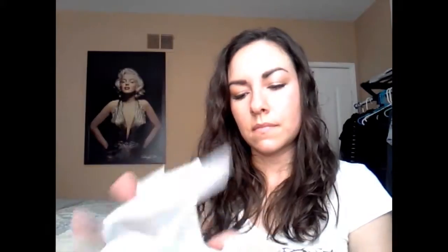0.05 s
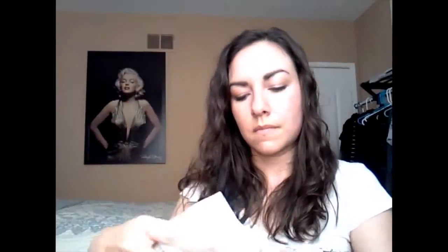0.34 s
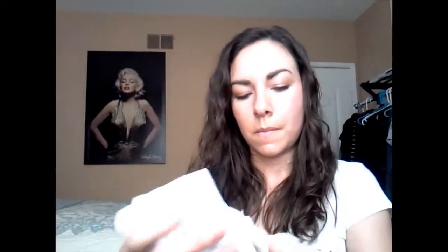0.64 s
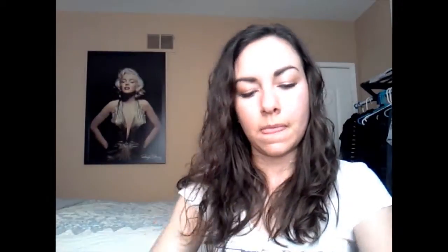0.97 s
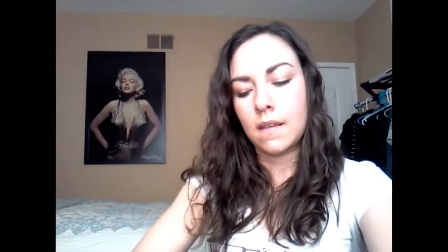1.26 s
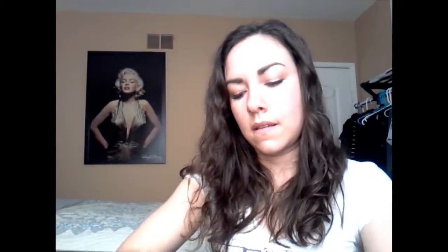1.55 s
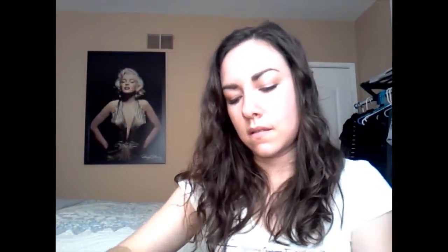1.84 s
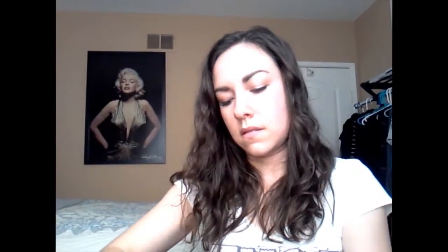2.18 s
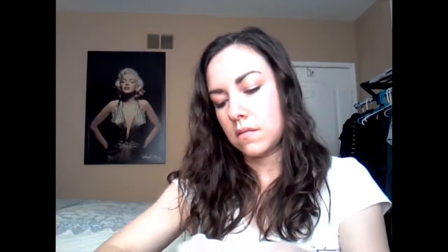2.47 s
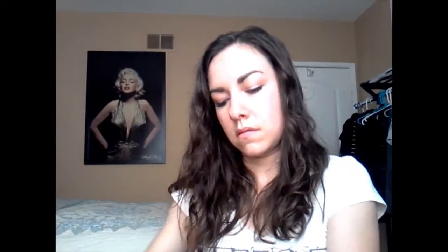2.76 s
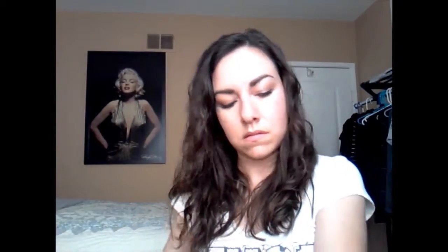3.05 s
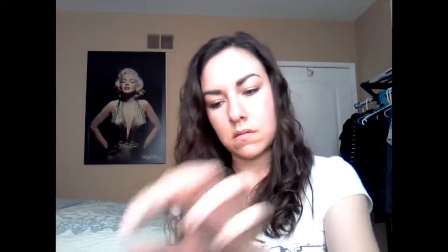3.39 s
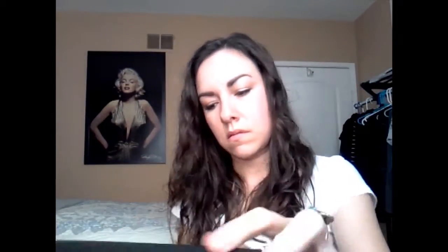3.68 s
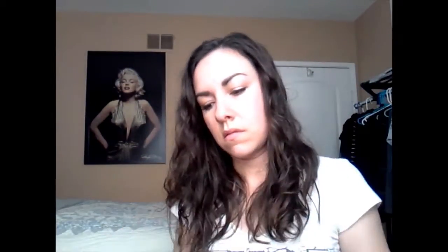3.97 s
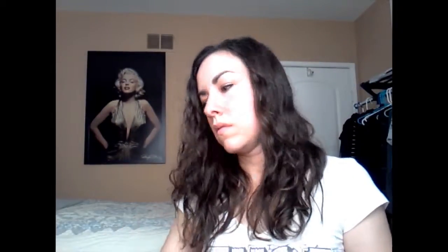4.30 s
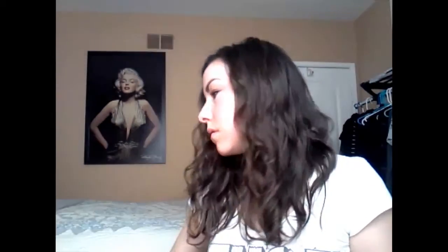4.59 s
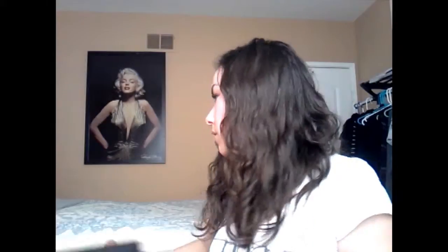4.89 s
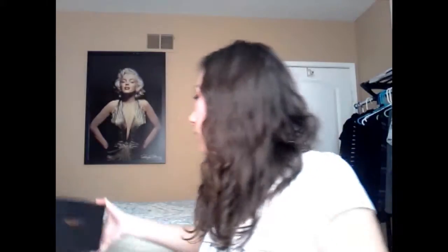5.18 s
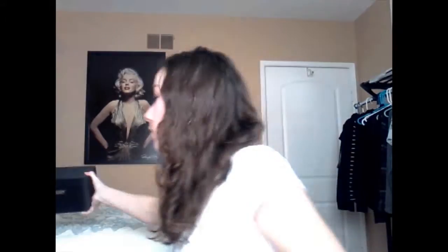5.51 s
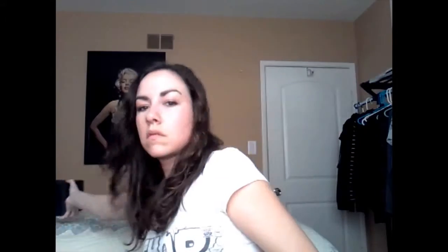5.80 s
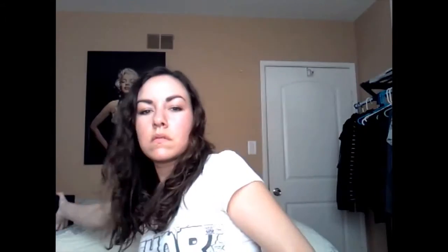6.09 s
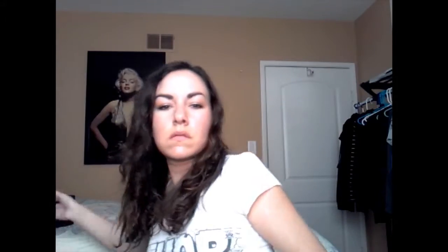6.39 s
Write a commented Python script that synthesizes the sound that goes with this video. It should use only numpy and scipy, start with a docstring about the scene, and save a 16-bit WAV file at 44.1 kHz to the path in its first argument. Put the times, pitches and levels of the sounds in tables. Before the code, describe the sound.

Thin tissue paper crinkles close by, then a box scrapes and knocks onto a desk, followed by soft bumps.

```python
"""Tissue paper and a box on a desk.

Tissue paper is crumpled and pushed aside near a small mono microphone in a bedroom: creases buckle
and shake the sheet. A box slides out, its slips ringing the cavity in a hollow scrape. One knock
rings box and desk as it is set down. Soft bumps and brushes follow over mains hum and mic hiss."""
import sys
import numpy as np
from scipy import signal
from scipy.fft import rfft, irfft, next_fast_len
from scipy.io import wavfile
from scipy.ndimage import map_coordinates

SR = 44100
rng = np.random.default_rng(int(sys.argv[2]) if len(sys.argv) > 2 else 0)


def materialize(psi):
    """Save the field psi as 16-bit PCM at rate SR to the path in sys.argv[1].

    A 1-D psi becomes a single channel; in a 2-D psi each row is a channel.
    """
    bounded = np.clip(np.atleast_2d(psi).T, -1, 1)
    quanta = np.round(bounded * 32767).astype(np.int16)
    wavfile.write(sys.argv[1], SR, quanta)


N = 293265

# paper squeezes: start_s, hold_s, crinkle_db, flutter_db, fizz_db
PAPER_SQUEEZES = [(0.005, 0.14, -25.5, -32, -34), (0.186, 0.033, -30, -33, -38),
                  (0.291, 0.11, -28.5, -34.5, -36.5), (0.436, 0.19, -26.5, -33.5, -34),
                  (0.785, 0.25, -37.5, -41, -49.5), (0.878, 0.021, -35, -39.5, -38),
                  (1.019, 0.092, -30, -32.5, -36), (1.174, 0.017, -31.5, -29.5, -42),
                  (1.24, .11, -42.5, -40.5, -52.5), (1.4, 0.14, -48, -48, -58),
                  (1.525, 0.065, -43, -57, -53), (1.942, 0.095, -54, -58, -64),
                  (2.094, .035, -43.5, -37, -51.5), (2.17, 0.13, -39.5, -38.5, -47.5),
                  (2.359, .108, -47.5, -50, -56.5), (2.502, 0.11, -43, -44.5, -50.5),
                  (2.678, 0.31, -34.5, -35.5, -43), (2.826, .014, -31, -51, -32.5),
                  (3.05, 0.0069, -44.5, -40.5, -54)]
# single creases snapping: start_s, level_db
CREASE_SNAPS = [(0.1304, -12), (0.1515, -19), (0.1864, -12), (0.293, -24), (0.3822, -9.5), (0.472, -15),
                (0.4942, -12), (0.5974, -17), (1.168, -17.5), (1.6337, -26.5), (2.5, -25.5), (2.6713, -16),
                (2.8449, -12), (2.9726, -23), (3.4052, -33.5)]
# box pushes: start_s, hold_s, drag_db, scrape_db
BOX_SLIDES = [(2.068, 0.042, -38, -28), (2.135, 0.065, -33.5, -33), (2.715, 0.21, -43.5, -34.5),
              (5.335, 0.029, -47, -61), (5.53, 0.038, -48, -62), (5.78, 0.036, -47.5, -55.5)]
# hand and cloth strokes: start_s, hold_s, swish_db, body_db
BRUSH_STROKES = [(3.41, 0.15, -53, -53.5), (3.64, 0.075, -53, -54.5), (4.135, 0.016, -59, -49.5),
                 (5.122, 0.0073, -52.5, -52.5), (5.348, 0.004, -45.5, -41.5), (5.77, 0.02, -64, -49.5)]
# hard box contacts: start_s, thud_db, clack_db, tick_db, pitch_hz
BOX_KNOCKS = [(1.083, -20, -11.5, -40, 380), (3.7622, -15.5, -39, -65, 200),
              (3.7708, -8.5, -16.5, -22, 184), (3.813, -19, -42, -65, 129)]
# soft desk contacts: start_s, thud_db, clack_db, pitch_hz
DESK_BUMPS = [(0.216, -40, -24, 232), (1.095, -32, -20, 253), (1.303, -56, -23.5, 300),
              (1.33, -30.5, -42, 136), (1.461, -39, -42, 159), (1.5, -46, -26, 113),
              (1.593, -43.5, -43, 134), (2.15, -29.5, -45.5, 163), (3.036, -20.5, -33, 187),
              (3.385, -33, -44, 116), (3.895, -28, -33, 237), (3.977, -47, -38.5, 200),
              (4.002, -26.5, -35.5, 182), (4.103, -34, -43, 109), (4.696, -32, -42, 147),
              (4.899, -38, -42.5, 190), (5.343, -52, -32, 302), (5.513, -34.5, -41, 230),
              (5.767, -37, -44, 160)]
# desk modes: freq_hz, gain_db, free_t60_s
DESK_MODES = [(102.4, -5.5, 0.62), (123, 3.5, 0.27), (154.7, -6, 0.47), (219.4, 0, 0.12), (236.3, 5, 0.13),
              (264.6, -3.5, 0.27), (329, -3, 0.14), (392, 4, 0.075), (480.5, -11.5, 0.27)]
# box cavity modes: freq_hz, width_hz, gain_db
BOX_MODES = [(510, 93, -3), (693, 242, 0.5), (776, 140, 3), (1264, 40, -6.5)]
# crease spectrum: freq_hz, gain_db
CRINKLE_EQ = [(200, -63), (800, -13.5), (1400, -5.5), (1650, -8.5), (1980, 3), (2120, -9), (2450, -0.5),
              (2900, -3), (3600, 3.5), (4200, 2), (7000, 3.5), (7900, -5), (8600, -15.5), (16000, -60)]
# shaken sheet spectrum: freq_hz, gain_db
FLUTTER_EQ = [(50, -23), (130, -13), (330, -8), (420, -8), (520, -1), (680, 6), (850, 4.5), (1040, -7.5),
              (1280, -2), (1600, -8.5), (4000, -51.5), (16000, -85)]
# finest crackle spectrum: freq_hz, gain_db
FIZZ_EQ = [(3000, -84), (7500, 2.5), (8800, -2.5), (9800, -1.5), (12500, -1.5), (14000, -7), (16000, -6.5)]
# low drag spectrum: freq_hz, gain_db
DRAG_EQ = [(40, -13), (110, -1), (200, 5), (330, -2), (450, -5), (900, -21.5), (2500, -35), (16000, -107)]
# hollow scrape spectrum: freq_hz, gain_db
SCRAPE_EQ = [(200, -40), (400, -11.5), (500, -3.5), (660, -0.5), (760, -7), (1000, -23), (2500, -30.5),
             (16000, -104)]
# edge click spectrum: freq_hz, gain_db
TICK_EQ = [(500, -32), (1100, -44), (1300, -3), (2000, -9), (3200, 3.5), (5300, -6), (6800, 2), (8200, -17),
           (16000, -29)]
# microphone hiss spectrum: freq_hz, gain_db
HISS_EQ = [(25, -26), (55, -10), (85, -12.5), (125, -10), (180, -12), (290, -12.5), (600, -16),
           (2000, -23.5), (5700, -25), (15500, -29.5)]
# mains hum: freq_hz, level_db
HUM_TONES = [(56.5, -57), (118, -66)]
# bedroom decay: freq_hz, t60_s
ROOM_DECAY = [(150, 0.22), (800, 0.4), (4000, 0.35), (12000, 0.11)]


def paper():
    """Creases buckle in small avalanches, crackle and shake the sheet, then slowly relax."""
    squeezing = strokes(PAPER_SQUEEZES, rise_db_per_s=287, fall_db_per_s=240)
    relaxing = amp(-9.5) * strokes(PAPER_SQUEEZES, rise_db_per_s=287, fall_db_per_s=99)
    crinkle, flutter, fizz = np.hypot(squeezing, relaxing)
    clump = amp(1.5 * wobble(60) + 0.84 * wobble(300))
    folds = room(impulses(rate_hz=2600, spread_db=2, clump=clump), wet_db=-6.5)
    tips = room(impulses(rate_hz=1500, spread_db=1, clump=clump), wet_db=-13.5)
    fibres = room(impulses(rate_hz=5300, spread_db=-1, clump=clump), wet_db=-11.5)
    # long folds sound low, sharp tips high
    low_share = lambda hz: 1 / (1 + (hz / 4800) ** 4)
    creases = filtered(folds, lambda hz: np.sqrt(low_share(hz)))
    creases += filtered(tips, lambda hz: np.sqrt(1 - low_share(hz)))
    return (crinkle * unit(coloured(creases, CRINKLE_EQ))
            + flutter * unit(coloured(folds, FLUTTER_EQ))
            + fizz * unit(coloured(fibres, FIZZ_EQ)))


def snaps():
    """Larger creases flip over in a fast-swelling crack."""
    track = np.zeros(N)
    rise_s = 0.00056
    for start_s, level_db in CREASE_SNAPS:
        crack = burst(t60_s=0.012)
        crack *= 1 - np.exp(-np.arange(len(crack)) / SR / rise_s)
        sheet = coloured(crack, CRINKLE_EQ) + coloured(crack, FLUTTER_EQ)
        fizz = amp(-5.5) * coloured(crack, FIZZ_EQ)
        add(track, start_s, amp(level_db) * unit_peak(sheet + fizz))
    return room(track, wet_db=-4)


def box_slide():
    """The box drags in small slips that ring its cavity."""
    drag, scrape = strokes(BOX_SLIDES, rise_db_per_s=197, fall_db_per_s=162)
    slips = impulses(rate_hz=2500, spread_db=0, clump=amp(0.94 * wobble(90)))
    return drag * unit(coloured(slips, DRAG_EQ)) + scrape * unit(coloured(slips, SCRAPE_EQ))


def knocks():
    """The box hits the desk: desk ring, hollow clack, click of the hard edge."""
    desk, box = np.zeros(N), np.zeros(N)
    for start_s, thud_db, clack_db, tick_db, pitch_hz in BOX_KNOCKS:
        thud = desk_thud(pitch_hz, focus_db=4.5, damping=1.7, scatter_db=1,
                         detune=0.0075, rise_s=0.0039, loose_rad=0.87)
        add(desk, start_s, amp(thud_db) * thud)
        add(box, start_s, amp(clack_db) * box_clack(contact_s=0.0002, roughness=0.0099))
        add(box, start_s, amp(tick_db) * unit_peak(coloured(burst(t60_s=0.019), TICK_EQ)))
    return desk + room(box, wet_db=-9.5)


def bumps():
    """Hands and box nudge the desk, scuff and rock back once; the resting hand damps the ring."""
    desk, box = np.zeros(N), np.zeros(N)
    rebounds = [(start_s + 0.035, thud_db - 9, clack_db - 9.5, pitch_hz)
                for start_s, thud_db, clack_db, pitch_hz in DESK_BUMPS]
    for start_s, thud_db, clack_db, pitch_hz in DESK_BUMPS + rebounds:
        thud = desk_thud(pitch_hz, focus_db=11, damping=1.87, scatter_db=3.5,
                         detune=0.042, rise_s=0.0038, loose_rad=3.03)
        add(desk, start_s, amp(thud_db) * thud)
        add(box, start_s, amp(clack_db) * box_clack(contact_s=0.00051, roughness=0.13))
        scuff = unit_peak(coloured(burst(t60_s=0.087), DRAG_EQ))
        add(box, start_s, amp(clack_db - 14.5) * scuff)
    return desk + room(box, wet_db=-12.5)


def desk_thud(pitch_hz, focus_db, damping, scatter_db, detune, rise_s, loose_rad):
    """A blow favours the desk modes near its pitch; loose contact starts them out of phase."""
    t = np.arange(SR // 2) / SR
    ring = np.zeros(len(t))
    for freq_hz, gain_db, free_t60_s in DESK_MODES:
        gain_draw, freq_draw, phase_draw = rng.standard_normal(3)
        strike_db = gain_db + scatter_db * gain_draw - focus_db * np.log2(freq_hz / pitch_hz) ** 2
        phase_rad = 2 * np.pi * freq_hz * (1 + detune * freq_draw) * t + loose_rad * phase_draw
        ring += amp(strike_db - 60 * t * damping / free_t60_s) * np.sin(phase_rad)
    attack = 1 - np.exp(-(t / rise_s) ** 2)
    return unit_peak(ring * attack)


def box_clack(contact_s, roughness):
    """A short, slightly rough push rings the hollow box."""
    def cavity(hz):
        modes = sum((-1) ** k * amp(gain_db) * 1j * hz * width_hz
                    / (freq_hz ** 2 - hz ** 2 + 1j * hz * width_hz)
                    for k, (freq_hz, width_hz, gain_db) in enumerate(BOX_MODES))
        return modes / (1 + 1j * hz / 1500)  # one-pole low-pass
    progress = np.arange(SR // 4) / SR / contact_s
    push = progress * np.exp(-progress) + roughness * burst(t60_s=0.028)
    return unit_peak(filtered(push, cavity))


def brushes():
    """Hands and cloth brush lightly in a grainy swish."""
    swish, body = strokes(BRUSH_STROKES, rise_db_per_s=520, fall_db_per_s=254)
    grain = room(impulses(rate_hz=4000, spread_db=4, clump=amp(2.2 * wobble(120))), wet_db=-2)
    return swish * unit(coloured(grain, CRINKLE_EQ)) + body * unit(coloured(grain, FLUTTER_EQ))


def room(x, wet_db):
    """Direct sound plus wall reflections, redrawn every 0.2 s as the source moves."""
    echo = np.zeros(N)
    hop = SR // 5
    for start in range(0, N, hop):
        hz, t, noise = signal.stft(rng.standard_normal(SR // 3), SR, nperseg=256)
        decay = amp(-60 * t / log_interp(ROOM_DECAY, hz)[:, None])
        tail = signal.istft(noise * decay, SR, nperseg=256)[1]
        tail /= np.linalg.norm(tail)
        add(echo, start / SR + 0.0025, signal.fftconvolve(x[start:start + hop], tail))
    return (x + amp(wet_db) * echo) / np.hypot(1, amp(wet_db))


def hum_and_hiss():
    """Slightly wavering mains hum, steady microphone hiss."""
    t = np.arange(N) / SR
    hum = sum(amp(level_db) * unit(np.sin(2 * np.pi * freq_hz * t + 0.61 * wobble(4.3)))
              for freq_hz, level_db in HUM_TONES)
    return hum + amp(-51.5) * unit(coloured(rng.standard_normal(N), HISS_EQ))


def strokes(rows, rise_db_per_s, fall_db_per_s):
    """Swell, hold and fade per row, summed in power; one envelope per dB column."""
    rows = np.array(rows)
    age_s = np.arange(N) / SR - rows[:, :1]
    hold_s, levels_db = rows[:, 1:2], rows[:, 2:].T
    shape_db = rise_db_per_s * np.minimum(age_s, 0) - fall_db_per_s * np.maximum(age_s - hold_s, 0)
    return np.sqrt(amp(levels_db) ** 2 @ amp(np.maximum(shape_db, -120)) ** 2)


def impulses(rate_hz, spread_db, clump):
    """Random impulses, sizes scaled by the clump envelope; rms 1."""
    fires = rng.random(N) < rate_hz / SR
    size = amp(spread_db * np.clip(rng.standard_normal(N), -2, 2))
    return unit(fires * size * rng.choice([-1, 1], N) * clump)


def burst(t60_s):
    """Decaying noise."""
    t = np.arange(SR // 4) / SR
    return amp(-60 * t / t60_s) * rng.standard_normal(len(t))


def wobble(rate_hz):
    """Smooth random curve."""
    knots = rng.standard_normal(int(N * rate_hz / SR) + 4)
    return map_coordinates(knots, [np.arange(N) * rate_hz / SR])


def coloured(x, eq):
    """Minimum-phase filter through (freq_hz, gain_db) points."""
    def response(hz):
        cepstrum = irfft(np.log(amp(log_interp(eq, hz))))
        half = len(cepstrum) // 2
        cepstrum[1:half] *= 2
        cepstrum[half + 1:] = 0
        return np.exp(rfft(cepstrum))
    return filtered(x, response)


def filtered(x, response):
    """FFT filter with gain response(hz)."""
    size = 2 * next_fast_len(len(x) // 2 + 4096)
    return irfft(rfft(x, size) * response(np.fft.rfftfreq(size, 1 / SR)), size)[:len(x)]


def log_interp(points, hz):
    """Interpolate (freq_hz, value) points on a log axis."""
    freqs_hz, values = np.transpose(points)
    return np.interp(np.log(hz + 1), np.log(freqs_hz + 1), values)


def add(track, start_s, sound):
    """Mix in place."""
    part = track[max(round(start_s * SR), 0):][:len(sound)]
    part += sound[:len(part)]


def amp(db):
    """dB to gain."""
    return 10 ** (np.asarray(db) / 20)


def unit(x):
    """Scale to rms 1."""
    return x / np.sqrt(np.mean(x ** 2) + 1e-20)


def unit_peak(x):
    """Scale to peak 1."""
    return x / np.abs(x).max()


def scene():
    """One microphone, same in both channels."""
    mono = paper() + snaps() + box_slide() + brushes() + bumps() + knocks() + hum_and_hiss()
    return np.array([mono, mono])


def record(dry):
    """Microphone bass cut, recorder band limit."""
    low_hz, top_hz = 41.7, 15720
    bass_cut = signal.butter(4, low_hz, "highpass", fs=SR, output="sos")
    return np.array([filtered(channel, lambda hz: hz < top_hz)
                     for channel in signal.sosfilt(bass_cut, dry)])


dry = scene()
out = record(dry)
materialize(out)
```